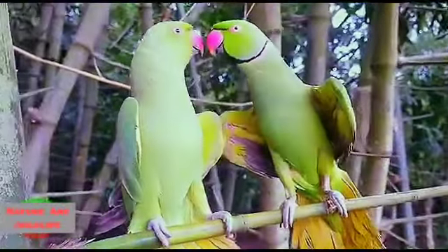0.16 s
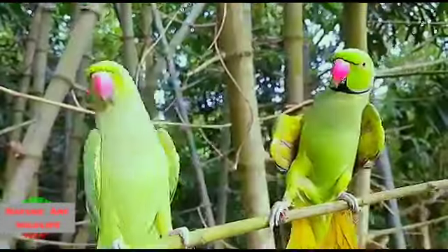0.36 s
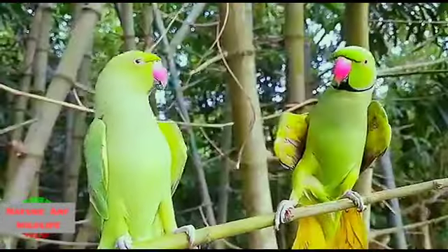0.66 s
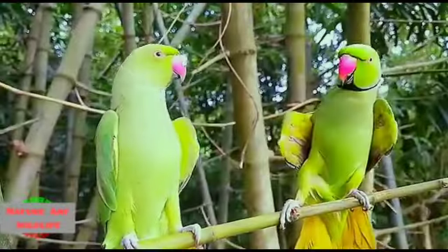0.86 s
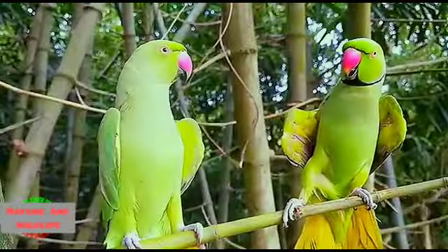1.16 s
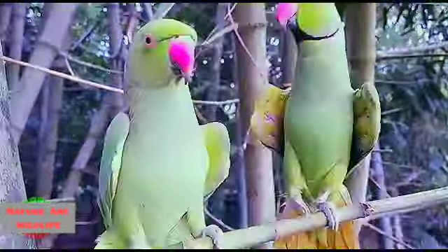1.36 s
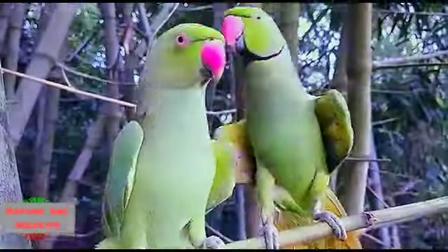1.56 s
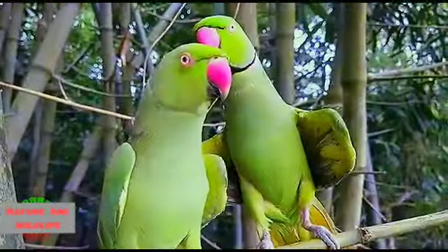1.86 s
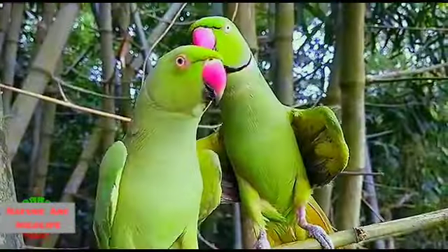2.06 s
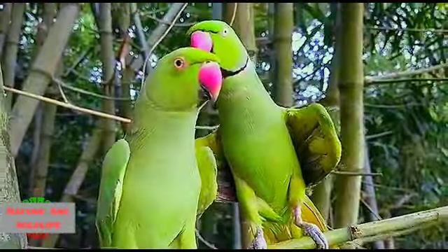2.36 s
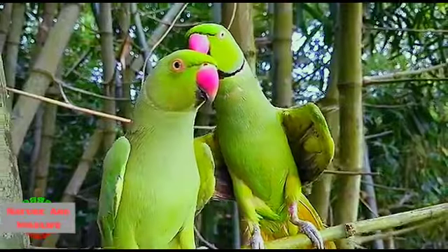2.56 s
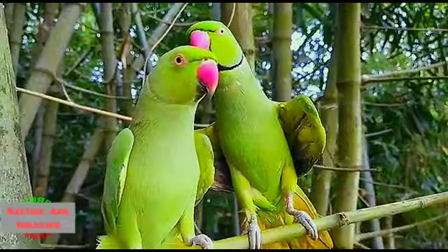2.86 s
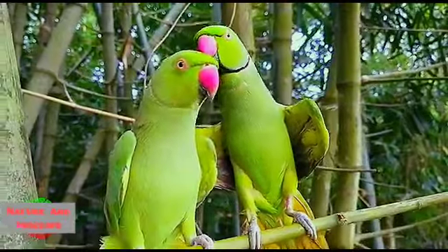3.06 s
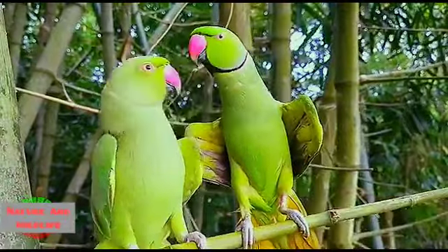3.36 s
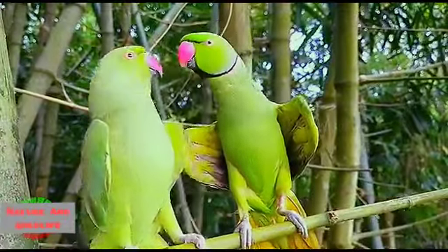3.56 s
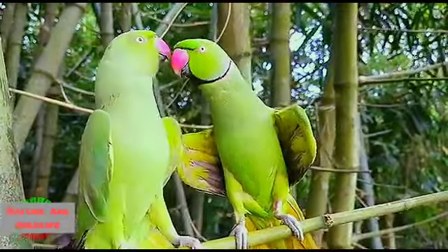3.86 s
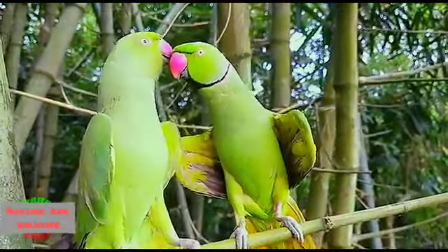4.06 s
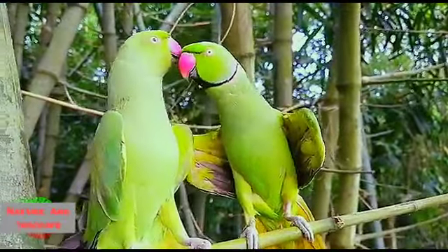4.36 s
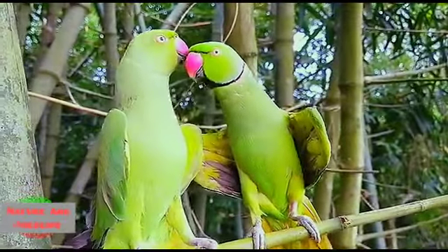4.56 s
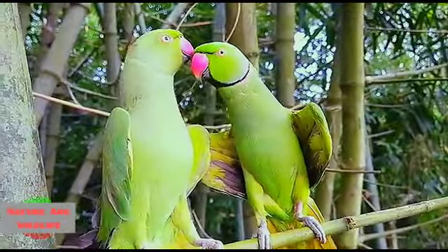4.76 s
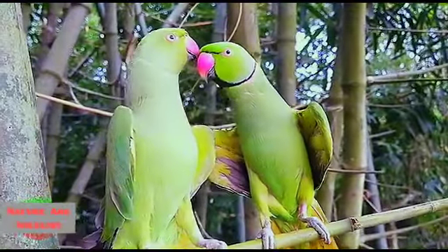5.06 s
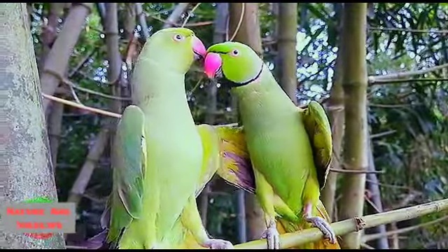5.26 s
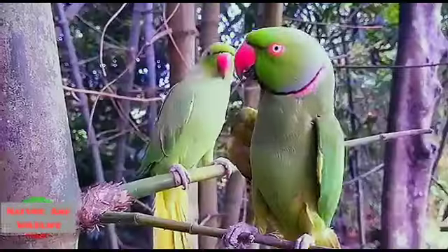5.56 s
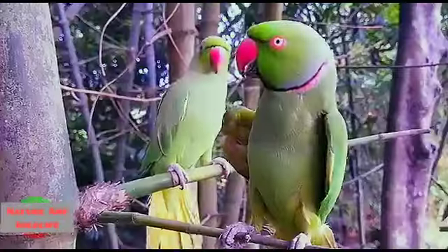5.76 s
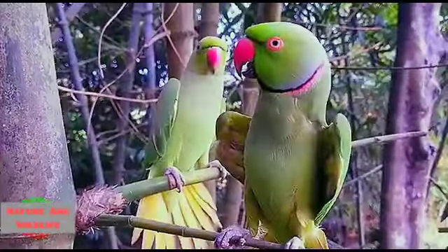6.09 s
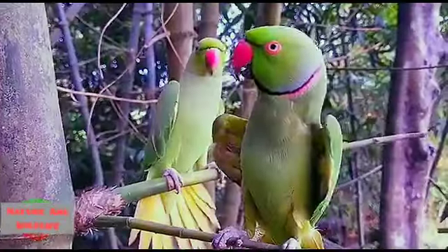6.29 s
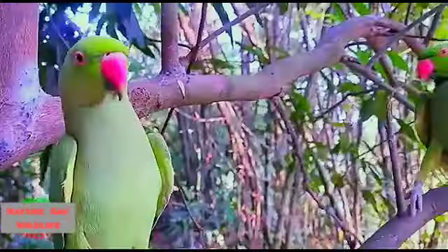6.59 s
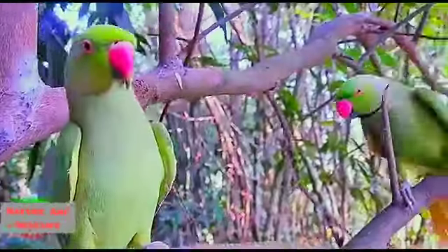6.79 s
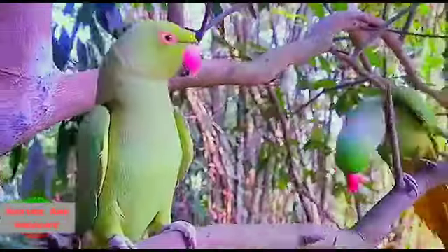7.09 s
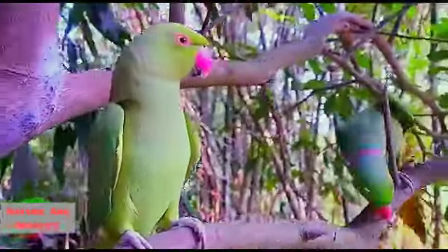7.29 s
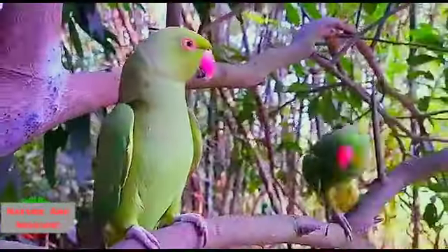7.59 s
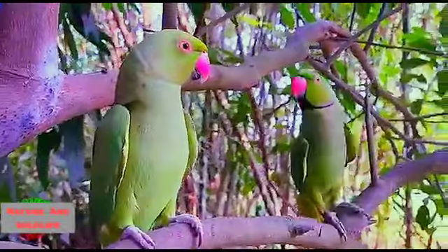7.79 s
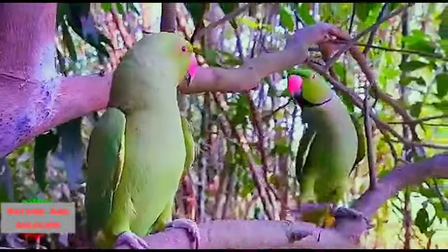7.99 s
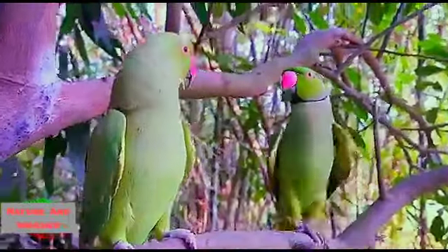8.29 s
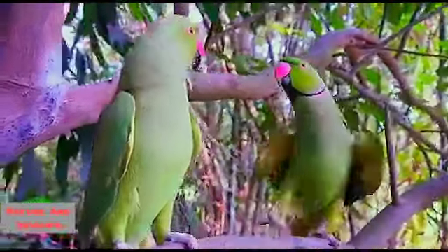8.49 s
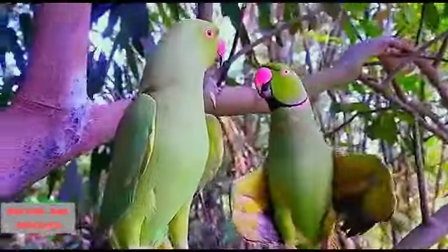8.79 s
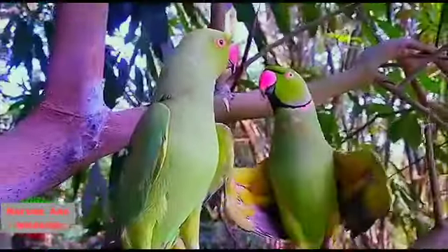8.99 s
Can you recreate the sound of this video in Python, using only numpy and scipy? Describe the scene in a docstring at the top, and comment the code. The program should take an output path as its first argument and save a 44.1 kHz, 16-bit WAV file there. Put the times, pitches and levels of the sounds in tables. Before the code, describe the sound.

A nasal parakeet squawk opens at 0 seconds, about 0.15 long, followed by a loud piercing whistle blip at 0.4. From 0.6 to 1.45 dull noisy tocks alternate with hard, bright voiced chips, roughly twelve a second. Between 1.7 and 2.9 short squawks, many brightening midway, mingle with arching whistles and softer chips, then fade. A small whistle at 3.6 leads to a long fluttering one from 3.7 to 4.5, with a higher strand sweeping upward around 4.2. Four crisp tocks follow from 4.55 to 5.1; tocks and chips alternate again from 5.63 to 6.15, with a few more until 6.95. Then mostly quiet, with thin high two-note far birds at 7, 7.5 and 8. Two squawks around a chip close it, 8.75 to 9.14. Faint leaves, distant chorus and low outdoor air lie beneath; close stereo, little echo.

```python
"""A nasal parakeet squawk is heard first, then gliding whistles and very short tocks and chips in a bamboo grove.
Squawks are harmonic series shaped by a resonant throat, their upper harmonics changing once; whistles are
modulated near-sines. Tocks and chips are decaying bursts of noise or harmonics that ring in the beak.
Far birds are thin gliding sines; a chorus, leaves and a low outdoor rumble are band-filtered noise.
A spaced microphone pair hears level and arrival-time differences between left and right."""
import sys
import numpy as np
from scipy import signal
from scipy.io import wavfile
from scipy.ndimage import uniform_filter1d, map_coordinates

SR = 44100
rng = np.random.default_rng(int(sys.argv[2]) if len(sys.argv) > 2 else 0)


def file_out(sig):
    """Save sig as 16-bit WAV at sys.argv[1]."""
    # one column per channel
    cols = np.atleast_2d(sig).T
    # limit, then scale
    lim = np.clip(cols, -1, 1)
    pcm = np.round(lim * 32767).astype(np.int16)
    wavfile.write(sys.argv[1], SR, pcm)


N = 403074

# Outdoor air noise. Each row: frequency in Hz, relative density in dB per Hz.
AIR_SPECTRUM = [(15, -49), (25, -19.5), (92, -20.5), (282, -2.5), (818, -12.5), (1680, -11), (4490, -28),
                (6520, -20), (8740, -21), (9730, -31), (14500, -20.5)]
AIR_DB = -70.5
# Leaf noise. Each row: frequency in Hz, relative density in dB per Hz.
LEAF_SPECTRUM = [(600, -40.5), (1300, -17.5), (2200, -4.5), (3600, -14.5), (5200, -0.5), (7200, 0.5),
                 (10000, -14.5), (14200, -8.5)]
# Rise and fall of leaves and far chorus. Each row: time in seconds, level in dB.
RUSTLE_LEVEL = [(0, -79), (.35, -63), (.6, -58.5), (1.5, -58), (2.7, -63), (2.901, -59.5), (3.15, -63.5),
                (3.451, -54.5), (3.699, -63.5), (5.098, -62.5), (5.25, -78.5), (5.5, -87), (5.56, -64),
                (6.898, -62.5), (7.201, -70), (9.14, -84.5)]
# Left-right coherence of the noise. Each row: frequency in Hz, likeness (1 = identical sides).
LIKENESS = [(60, 0.504), (250, 0.77), (700, .15), (1500, .05), (15000, 0.3)]

# Far short downward slurs. Each row: start in seconds, level in dB.
FAR_SLURS = [(1.212, -51), (2.768, -50), (2.826, -48), (3.299, -62.5), (3.357, -60), (3.415, -50.5),
             (3.889, -51), (3.947, -51.5), (4.005, -49), (4.475, -58), (4.53, -54), (4.975, -54),
             (5.122, -48), (5.18, -51.5), (5.497, -62), (5.552, -64), (6.05, -51.5), (6.108, -52)]
# Nominal shape of every slur. The row: length in seconds, first pitch in Hz, last pitch in Hz.
SLUR_SHAPE = (0.032, 2600, 1800)
# A far bird's phrase. Each row: start in seconds, high note level in dB, low note level in dB.
FAR_PHRASES = [(6.953, -51, -53.5), (7.528, -56.5, -57), (8.031, -63.5, -61.5)]
# Its two notes, high then low. Each row: delay in seconds, length in seconds, first Hz, last Hz.
PHRASE_NOTES = [(0, 0.167, 8070, 8680), (0.168, 0.33, 5955, 6760)]
# Other far notes. Each row: start in seconds, length in seconds, first Hz, last Hz, level in dB.
FAR_NOTES = [(0.12, 0.11, 6070, 5900, -62), (0.475, 0.17, 2240, 1950, -59.5),
             (2.752, 0.12, 7350, 6830, -51.5), (4.602, 0.03, 2070, 1980, -53),
             (6.208, 0.13, 6980, 7270, -51.5), (6.428, 0.055, 8000, 8500, -46),
             (6.674, 0.074, 6680, 7280, -55.5), (7.181, 0.24, 1814, 1779, -72.5)]

# Dull noisy tocks. Each row: start in seconds, nominal peak in dB, beak ring in Hz, ring and snap in dB,
# top part in dB, 60 dB decay time in seconds, lead-in copy in dB, low ring in Hz.
TOCKS = [(0.626, -6, 3700, -1, -11.5, 0.032, -17, 811), (0.777, -6, 4724, -1, -14, 0.059, -24, 804),
         (0.941, -6, 3880, -4.5, -10.5, 0.054, -27, 1146), (1.101, -5.5, 4130, -8.5, -18, 0.044, -23, 757),
         (1.443, -22.5, 4300, -16, -30, 0.053, -24, 879), (4.559, -7.5, 4650, -16, -4, 0.078, -27.5, 1139),
         (4.736, -5.5, 4980, -14.5, -6.5, 0.069, -18.5, 1287),
         (4.913, -3.5, 5230, -18.5, -8.5, 0.055, -15, 1251), (5.071, -5.5, 4880, -17, -7, 0.081, -31, 1027),
         (5.63, -9.5, 4264, 3, -8, 0.081, -20.5, 725), (5.796, -6, 4580, 2.5, -9.5, 0.058, -21, 783),
         (6.442, -42, 4840, 2, -23, 0.13, -24, 1107), (6.512, -4, 4510, -4.5, -19.5, 0.049, -26, 1112),
         (6.737, -13.5, 4410, 4.5, -31, 0.067, -37, 1065)]
# Deeper tocks are fuller. Each row: low ring in Hz, low part in dB.
TOCK_LOW = [(750, -12.5), (1150, -21.5)]
TOCK_PAN_DB = 2  # left against right
KNOCK_DB = -51.5  # faint low push under each tock, against its ring
SNAP_S, SNAP_FALL = 0.0017, 0.37  # decay to 1/e; pitch fall over twice that time, as a share of the ring

# Voiced chips. Each row: start in seconds, nominal peak in dB, beak ring in Hz, left-right in dB,
# lead-in copy in dB, pitch in Hz.
CHIPS = [(0.707, -14, 5530, -6, -21, 1083), (0.864, -4.5, 6160, -5.5, -17, 1454),
         (1.002, -2, 6330, 5.5, -29, 1490), (1.143, -3.5, 6150, -5.5, -24, 1474),
         (1.311, -2, 6150, -6.5, -21.5, 1471), (1.913, -20.5, 5530, -7, -3, 2080),
         (2.144, -20.5, 5410, -9, -7, 1947), (2.374, -15, 5270, -17.5, -15.5, 1848),
         (2.63, -20, 5350, -15, -31, 1802), (5.673, -11, 7000, 4.5, -11.5, 1262),
         (5.828, -6, 9800, -3.5, -10, 1515), (5.977, -5, 5850, 14, -17, 1462),
         (6.132, -4, 5790, 3, -41, 1440), (6.58, -6.5, 4830, -2, -14.5, 1470),
         (6.617, -24.5, 5960, -4, -15, 1005), (6.951, -18.5, 6990, -5.5, -27, 1653),
         (8.947, -12.5, 6280, -5.5, -25, 2100)]
# Harder chips last longer. Each row: peak in dB, 60 dB decay time in seconds.
CHIP_DECAY = [(-15.5, 0.016), (-3.5, 0.021)]
# High chips are dull. Each row: pitch in Hz, top part in dB.
CHIP_TOP = [(1500, -6), (1750, -32)]
CHIP_LOW_DB, CHIP_LOW_PER_DB = -17, -0.13  # the low part stands out less the harder the chip

# Whistles, one table each. Each row: time in seconds, pitch in Hz, level in dB.
WHISTLES = [
    [(0.37, 3870, -60.5), (0.38, 3610, -41), (0.387, 3408, -0.5), (0.395, 3980, -18.5), (0.401, 4213, -9),
     (0.41, 4550, -23), (0.423, 4000, -45.5)],
    [(1.692, 2860, -50.5), (1.705, 3240, -27), (1.74, 3393, -23), (1.775, 3640, -24.5),
     (1.798, 4400, -15.5), (1.806, 4630, -29.5)],
    [(1.879, 4070, -34), (1.893, 3900, -25.5), (1.93, 3784, -21.5), (1.955, 4440, -14.5),
     (1.985, 4844, -11.5), (2.03, 4933, -17.5), (2.08, 4775, -11), (2.115, 4076, -16.5), (2.126, 3860, -27),
     (2.147, 3530, -14), (2.175, 3035, -31), (2.23, 2154, -31)],
    [(3.577, 2515, -43.5), (3.6, 2573, -26.5), (3.62, 2757, -29), (3.64, 2977, -21), (3.647, 2760, -69)],
    [(3.717, 3250, -30.5), (3.75, 3376, -21), (3.8, 3560, -22), (3.875, 3765, -18), (3.89, 3960, -29),
     (3.93, 4144, -22), (3.97, 4326, -23.5), (4.02, 4440, -15), (4.058, 4600, -33.5), (4.075, 4620, -21),
     (4.095, 4560, -29.5), (4.15, 4520, -26), (4.25, 4230, -28.5), (4.37, 4110, -26.5),
     (4.412, 4087, -41.5), (4.445, 4010, -30), (4.475, 3950, -48), (4.492, 3890, -31.5), (4.51, 3930, -48)],
    [(4.064, 4600, -43.5), (4.075, 5160, -24.5), (4.085, 5120, -52.5)],
    [(4.113, 5840, -41.5), (4.13, 5824, -21), (4.17, 6020, -19), (4.2, 6450, -14), (4.232, 6900, -10.5),
     (4.25, 6960, -28.5)],
]
# One row a whistle. Each row: left-right in dB as the head is turned, flutter side tones in dB at a
# level of -18.5 dB, top overtones in dB at a level of -18 dB.
WHISTLE_COLOURS = [(-0.1, -35, -60), (-6.5, -41.5, -25), (-6, -36, -27.5), (4, -39.5, -43), (0.5, -31, -27),
                   (-29.5, -26, -62), (-7, -36.5, -21.5)]
FLUTTER_HZ, FLUTTER_PER_DB = 770, 0.46  # softer is less steady
OVERTONE_FOLLOWS = 0.6  # share of the level's swing
OVERTONE_PEAK_HZ, OVERTONE_DB_PER_KHZ = 13490, 3.5

# Squawks, one table each. Each row: time in seconds, pitch in Hz, first-harmonic level in dB.
SQUAWKS = [
    [(0, 1017, -29), (0.03, 1214, -33), (0.065, 1306, -33.5), (0.1, 1250, -34.5), (0.13, 1047, -36),
     (0.148, 850, -57)],
    [(1.72, 782, -59), (1.75, 784, -57), (1.79, 973, -48), (1.82, 1102, -45), (1.85, 1134, -35),
     (1.872, 1097, -45.5)],
    [(1.92, 923, -44), (1.95, 1044, -48.5), (1.99, 918, -57), (2.03, 1076, -46), (2.065, 1136, -39),
     (2.097, 1085, -40)],
    [(2.16, 1015, -42.5), (2.19, 929, -47.5), (2.23, 960, -46), (2.295, 1145, -37.5), (2.317, 1072, -45)],
    [(2.387, 1024, -45.5), (2.41, 928, -45.5), (2.45, 879, -57.5), (2.49, 930, -46.5), (2.525, 1093, -43),
     (2.55, 1112, -41.5), (2.565, 1116, -52.5)],
    [(2.645, 996, -45.5), (2.665, 950, -46), (2.7, 1009, -48), (2.76, 1006, -50), (2.89, 918, -54.5),
     (2.915, 854, -63)],
    [(8.755, 841, -76), (8.79, 828, -62), (8.82, 1032, -54.5), (8.85, 1148, -45), (8.885, 1190, -44.5),
     (8.905, 1171, -39), (8.92, 1110, -60)],
    [(8.96, 1125, -45), (8.985, 1007, -43), (9.02, 1005, -52.5), (9.05, 996, -47.5), (9.08, 1134, -45.5),
     (9.11, 1178, -38), (9.139, 1152, -44)],
]
# The upper harmonics change once in each squawk: most brighten as the beak opens, the first and sixth
# grow duller. Each row: time in seconds, upper harmonics before in dB and after in dB, against the first.
UPPER_CHANGES = [(0.05, -13.5, -18.5), (1.742, -5, 6), (2.02, 0, 5), (2.249, -14, 4.5), (2.5, -26, 2.5),
                 (2.68, -31.5, -42), (8.79, -20, 7), (9.047, -22, 11.5)]
UPPER_CHANGE_S = 0.02
# Throat response over the upper harmonics. Each row: frequency in Hz, gain in dB.
THROAT = [(3300, -5.5), (4500, 10.5), (5700, 4.5), (7000, -4.5), (8500, -8.5), (10500, -20), (12500, -30.5),
          (15500, -24)]
# Second harmonic. Each row: pitch in Hz, level in dB against the first harmonic.
SECOND_HARMONIC = [(850, 2), (1150, 1), (1300, 11)]

REPEAT_S = .0122  # every near call comes with a faint copy this much before and after
CUTOFF_HZ = 16400


def from_db(db):
    """Decibels are logarithmic: 20 dB is a factor of ten in amplitude."""
    return 10 ** (np.asarray(db) / 20)


def rms_one(x):
    """Power normalisation: scale to a root-mean-square of 1."""
    return x / np.sqrt(np.mean(x ** 2) + 1e-20)


def at_hz(points, hz):
    """Interpolation of a spectrum along a logarithmic frequency axis."""
    table = np.array(points)
    return np.interp(np.log(hz), np.log(table[:, 0]), table[:, 1])


def drift(rate_hz, size):
    """Slow random modulation: white noise through a two-pole low-pass, spread 1."""
    r = np.exp(-2 * np.pi * rate_hz / SR)
    white = rng.standard_normal(size + 4000)
    return rms_one(signal.lfilter([1], [1, -2 * r, r * r], white)[4000:])


def band(x, low_hz, high_hz):
    """Band-pass filtering keeps the power between two frequencies."""
    return signal.sosfilt(signal.butter(2, [low_hz, high_hz], "band", fs=SR, output="sos"), x)


def later(x, lag_s):
    """Propagation delay of a fraction of a sample, by interpolated reading."""
    return map_coordinates(x, [np.arange(len(x)) - lag_s * SR], order=3, cval=0)


def add(out, start, x, pan_db, lag_ms):
    """Stereo placement by level and arrival-time difference; the left side is the later one."""
    x = np.pad(x, (0, 30))[:N - start]
    x = x / np.sqrt(np.cosh(pan_db * np.log(10) / 20))  # same power at any pan
    end = start + len(x)
    out[0, start:end] += from_db(pan_db / 2) * later(x, lag_ms / 1000)
    out[1, start:end] += from_db(-pan_db / 2) * x


def note(rows, edge_s):
    """Continuous glide through a call's breakpoints: start sample, soft-edged window, rounded columns."""
    s, *columns = np.transpose(rows)
    start = round(s[0] * SR)
    t = np.arange(start, min(round(s[-1] * SR), N)) / SR
    window = np.clip(np.minimum(t - s[0], s[-1] - t) / edge_s, 0, 1)
    curves = [uniform_filter1d(np.interp(t, s, c), size=300, mode="nearest") for c in columns]
    return start, window, curves


def banded_noise(spectrum, patchy_db):
    """Partly coherent noise: half-octave bands, each with own level, flicker and likeness; rms 1."""
    out = 0
    edges = 23.4 * 2 ** np.arange(0, 9.6, .5)
    coarse = np.arange(N) / 50  # the flicker is drawn every 50 samples
    white = rng.standard_normal((2, 2, N))
    for k, (low, high) in enumerate(zip(edges, edges[1:])):
        centre = np.sqrt(low * high)
        mid, side = band(white[k % 2], low, high)
        alike = np.clip(at_hz(LIKENESS, centre), -1, 1)
        flicker = np.interp(coarse, np.arange(N // 50 + 2), drift(5.6 * 50, N // 50 + 2))
        gain = from_db(at_hz(spectrum, centre) + patchy_db * flicker)
        stereo = np.sqrt(1 + alike) * mid + np.sqrt(1 - alike) * side * [[1], [-1]]
        out = out + gain * stereo
    return rms_one(out)


def outdoor_air():
    """Broadband ambient noise weighted to the lows, heard as a rumble."""
    return from_db(AIR_DB) * banded_noise(AIR_SPECTRUM, patchy_db=2)


def chorus():
    """Superposition of many far birds: narrow noise bands that come and go independently; rms 1."""
    out = np.zeros((2, N))
    for hz in np.geomspace(1900, 8500, num=9):
        swing = np.clip(drift(13.2 * 50, N // 50 + 1), -3, 1.6)
        gate = np.repeat(from_db(5 * swing), repeats=50)[:N]
        out += gate * band(rng.standard_normal((2, N)), hz / 1.025, hz * 1.025)
    return rms_one(out)


def leaves_and_chorus():
    """Incoherent addition of leaf noise and far chorus under one common level curve."""
    level_db = np.interp(np.arange(N) / SR, *np.transpose(RUSTLE_LEVEL))
    leaves = banded_noise(LEAF_SPECTRUM, patchy_db=4.0)
    return from_db(level_db) * (leaves + from_db(-2.5) * chorus())


def grove(x, t60):
    """Scattering by stems and leaves: convolution with a decaying noise tail, own for each side."""
    t = np.arange(int(.3 * SR)) / SR
    tail = band(rng.standard_normal((2, len(t))), 1500, 14000)
    tail = tail * from_db(-60 * t / t60) * np.minimum(t / 0.015, 1)
    tail = tail / np.sqrt(np.sum(tail ** 2) / 2)
    return signal.fftconvolve(x, tail, axes=1)[:, :N]


def far_slurs():
    """Linear frequency sweep: a far bird drops quick, even downward slurs."""
    out = np.zeros((2, N))
    long, first_hz, last_hz = SLUR_SHAPE
    part = np.linspace(0, 1, round(long * SR))
    for s, level_db in FAR_SLURS:
        hz = (first_hz + (last_hz - first_hz) * part) * rng.normal(1, 0.033)
        tone = np.sin(np.cumsum(2 * np.pi * hz / SR))
        slur = from_db(level_db) * np.sin(np.pi * part) * tone
        add(out, round(s * SR), slur, pan_db=rng.normal(0, 2.5), lag_ms=rng.uniform(0, 0.55))
    return out


def far_birds():
    """Exponential pitch glides that waver more towards their end, independently at each microphone."""
    out = np.zeros((2, N))
    phrases = []
    for s, *levels in FAR_PHRASES:
        for (delay, *shape), db in zip(PHRASE_NOTES, levels):
            phrases.append((s + delay, *shape, db))
    for s, long, first_hz, last_hz, level_db in phrases + list(FAR_NOTES):
        start, part = round(s * SR), np.linspace(0, 1, round(long * SR))
        size = len(part)
        hz = last_hz + (first_hz - last_hz) * np.exp(-part / 0.28)
        for side in out:
            waver = 1 + 0.022 * part * drift(220, size)
            phase = np.cumsum(2 * np.pi * hz * waver / SR)
            swell = np.sin(np.pi * part ** 0.96) * from_db(level_db + 5.9 * drift(60, size))
            side[start:start + size] += swell * np.sin(phase)
    return out


def beak(out, row, burst, low_burst, lag_ms):
    """Resonance: a short burst rings in the beak and is placed with its faint lead-in copy."""
    s, peak_db, ring_hz, ring_db, low_db, top_db, pan_db, lead_db, low_hz = row
    parts = [
        band(burst, ring_hz / 1.145, ring_hz * 1.088),
        band(burst, 2300, np.minimum(2.05 * ring_hz, 16000)),
        band(band(low_burst, 0.69 * low_hz, 3.51 * low_hz), 0.89 * low_hz, 3300),
        band(band(burst, 7500, 15000), 12000, 15300),
    ]
    ring, body, low, top = [p / np.abs(p).max() for p in parts]
    clack = .5 * from_db(ring_db) * ring + 0.64 * body + from_db(low_db) * low + from_db(top_db) * top
    clack = from_db(peak_db) * clack
    ahead, t = round(REPEAT_S * SR), np.arange(len(burst)) / SR
    lead_in = from_db(lead_db) * clack * np.exp(-(t / 0.021) ** 2)
    twice = np.pad(clack, (ahead, 0)) + np.pad(lead_in, (0, ahead))
    add(out, round((s - .0015) * SR) - ahead, twice, pan_db, lag_ms)
    return out


def tocks():
    """Impulsive excitation: a sharp falling snap, then uneven noise that dies; the low part swells late."""
    out, t = np.zeros((2, N)), np.arange(int(.1 * SR)) / SR
    for s, peak_db, ring_hz, ring_db, top_db, t60, lead_db, low_hz in TOCKS:
        low_db = at_hz(TOCK_LOW, low_hz)
        row = s, peak_db, ring_hz, ring_db, low_db, top_db, TOCK_PAN_DB, lead_db, low_hz
        noise = rng.standard_normal(len(t)) * from_db(1.47 * drift(453, len(t)))
        # raspy pulses of falling rate
        rasp_phase = 2 * np.pi * low_hz * (t + 0.003927 * (1 - np.exp(-t / 0.00841)))
        noise *= 1 + 0.77 * np.cos(rasp_phase)
        since = np.maximum(t - 0.0018, 0)
        snap_phase = 2 * np.pi * ring_hz * (1.25 * since - SNAP_FALL * since ** 2 / (4 * SNAP_S))
        snap = np.sin(snap_phase) * np.exp(-since / SNAP_S)
        swell = noise * np.sin(np.pi * np.minimum(t / 0.0194, 1)) ** 2
        dying = noise * np.minimum(t / 0.0044, 1) ** 2 * from_db(-60 * t / t60)
        burst = dying + 0.97 * from_db(ring_db) * snap
        out = beak(out, row, burst, swell, lag_ms=0.027)
        push = np.sin(np.pi * np.minimum(t / 0.0021, 1))
        knock = from_db(peak_db + ring_db + KNOCK_DB) * push
        add(out, round(s * SR), knock, pan_db=1.5, lag_ms=0.02)
    return out


def chips():
    """Damped harmonic series of falling pitch and random phases, made hoarse by noise."""
    out, t = np.zeros((2, N)), np.arange(int(.07 * SR)) / SR
    for s, peak_db, ring_hz, pan_db, lead_db, hz in CHIPS:
        low_db = CHIP_LOW_DB + CHIP_LOW_PER_DB * peak_db
        row = s, peak_db, ring_hz, 0, low_db, at_hz(CHIP_TOP, hz), pan_db, lead_db, hz
        phase = 2 * np.pi * hz * (t + .2 * .004 * (1 - np.exp(-t / 0.00174)))
        t60 = np.interp(peak_db, *np.transpose(CHIP_DECAY))
        starts = rng.uniform(0, 2 * np.pi, 20)
        voice = rms_one(sum(np.sin(k * phase + starts[k]) for k in range(1, int(15000 / hz))))
        hoarse = 1.3 * rng.standard_normal(len(t)) * np.clip(t / 0.0059, .3, 3)
        attack = np.minimum(t / (0.22 * t60), 1) ** 2
        decay = from_db(-60 * np.maximum(t - 0.0035, 0) / t60)
        burst = (voice + hoarse) * attack * decay
        out = beak(out, row, burst, burst, lag_ms=0.2592)
    return out


def whistles():
    """Amplitude modulation: a fast flutter of the membrane adds side tones to near-sines with overtones."""
    out = np.zeros((2, N))
    for rows, (pan_db, calm_db, top_db) in zip(WHISTLES, WHISTLE_COLOURS):
        start, window, (hz, level_db) = note(rows, edge_s=0.0045)
        size = len(hz)
        flutter_db = calm_db - FLUTTER_PER_DB * (level_db + 18.5) + 4.0 * drift(12, size)
        flutter_db = np.minimum(flutter_db, -12)
        bright_db = top_db - (1 - OVERTONE_FOLLOWS) * (level_db + 18)
        phase = np.cumsum(2 * np.pi * hz * (1 + 0.0003 * drift(120, size)) / SR)
        flutter_phase = np.cumsum(2 * np.pi * FLUTTER_HZ * (1 + 0.041 * drift(33, size)) / SR)
        flutter = 1 + 2 * from_db(flutter_db) * np.sin(flutter_phase)
        tone = flutter * (1 + 0.056 * drift(500, size)) * np.sin(phase)
        for k in range(2, 5):
            high = np.clip((k * hz - 9500) / 2500, 0, 1)  # blends from low to high overtones
            fade = np.clip((15800 - k * hz) / 600, 0, 1)
            off_peak_khz = np.abs(k * hz - OVERTONE_PEAK_HZ) / 1000
            high_db = bright_db - OVERTONE_DB_PER_KHZ * off_peak_khz - 3.0 * (k == 4)
            overtone_db = high * high_db + (1 - high) * -37 + 3.1 * drift(80, size)
            tone += flutter ** 2 * fade * from_db(overtone_db) * np.sin(k * phase)
        wobble_db = 1.1 * drift(70, size)
        whistle = np.sqrt(2) * window * from_db(level_db + wobble_db) * tone
        add(out, start, whistle, pan_db, lag_ms=.066)
    return out


def squawks():
    """Source and filter: throat and beak shape the upper part of a harmonic voice, and breath hisses along."""
    out = np.zeros((2, N))
    for rows, (change_s, before_db, after_db) in zip(SQUAWKS, UPPER_CHANGES):
        start, window, (hz, first_db) = note(rows, edge_s=0.002)
        size = len(hz)
        t = (start + np.arange(size)) / SR
        changed = np.clip((t - change_s) / UPPER_CHANGE_S + .5, 0, 1)
        second_db = first_db + at_hz(SECOND_HARMONIC, hz) + 2.7 * drift(25, size)
        # a resonance near 2.8 kHz
        third_db = second_db + np.interp(hz, [900, 1300], [3.4, -12]) + 2.3 * drift(25, size)
        upper_db = first_db + before_db + (after_db - before_db) * changed
        fourth_db = 0.63 * upper_db + 0.35 * second_db + 6.0
        phase = np.cumsum(2 * np.pi * hz * (1 + 0.013 * drift(300, size)) / SR)
        voice = from_db(first_db) * np.sin(phase)
        for k, level_db in [(2, second_db), (3, third_db), (4, fourth_db)]:
            voice += from_db(level_db) * np.sin(k * phase)
        for k in range(5, 12):
            level_db = upper_db + at_hz(THROAT, k * hz) + 4.58 * drift(40, size)
            voice += from_db(level_db) * np.sin(k * phase + k * k)
        breath_db = np.maximum(upper_db, second_db - 6.5) - 13.5
        breath = from_db(breath_db) * band(rng.standard_normal(size), 2100, 8275)
        rough = 1 + .12 * drift(200, size)
        squawk = window * (np.sqrt(2) * rough * voice + breath)
        add(out, start, squawk, pan_db=2.0, lag_ms=.075)
    return out


def scene():
    """Superposition of air, leaves, far birds and near calls, each bird layer with its scattered tail."""
    background = outdoor_air() + leaves_and_chorus()
    far = far_slurs() + far_birds()
    hits = tocks() + chips()  # these already hold their lead-in copies
    voices = whistles() + squawks()
    ahead = round(REPEAT_S * SR)
    before = from_db(-19.5) * np.roll(voices, -ahead, axis=1)
    after = from_db(-17.5) * np.roll(voices + hits, ahead, axis=1)
    near = voices + hits + before + after
    scattered = from_db(-11) * grove(far, t60=0.68) + from_db(-30) * grove(near, t60=.3)
    return background + far + near + scattered


def lift(x, hz, width_hz, db):
    """Resonant equalisation: a peak (or a dip, below 0 dB) in the response."""
    return x + (from_db(db) - 1) * signal.lfilter(*signal.iirpeak(hz, hz / width_hz, fs=SR), x)


def record(dry):
    """Transducer response: the two microphones differ in colour, and a low-pass cuts the top."""
    left = lift(lift(dry[0], hz=5400, width_hz=1800, db=-6), hz=13500, width_hz=3000, db=2)
    right = lift(lift(dry[1], hz=5400, width_hz=1800, db=1.5), hz=13000, width_hz=3000, db=-3)
    low_pass = signal.cheby2(12, 60, CUTOFF_HZ, fs=SR, output="sos")
    return signal.sosfilt(low_pass, np.array([left, right]))


dry = scene()
out = record(dry)
file_out(out)
```